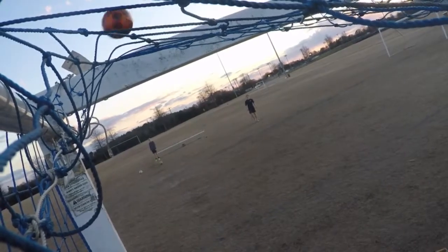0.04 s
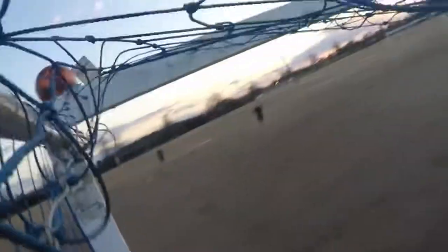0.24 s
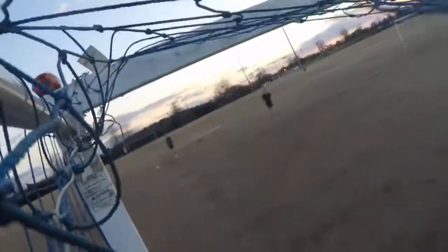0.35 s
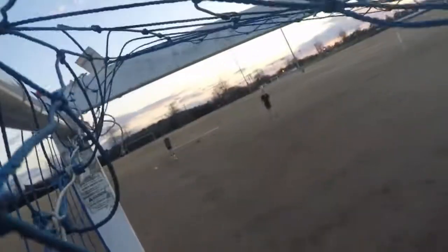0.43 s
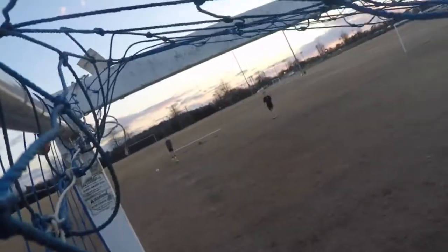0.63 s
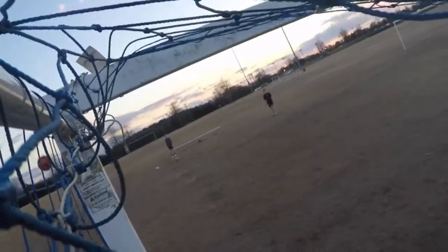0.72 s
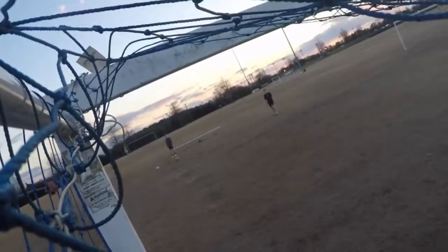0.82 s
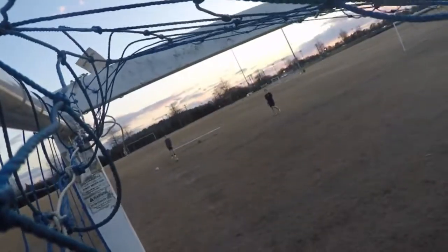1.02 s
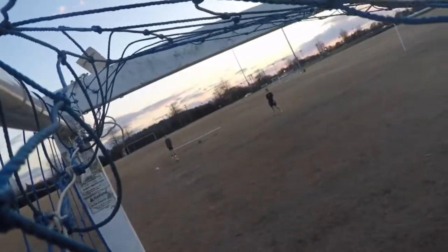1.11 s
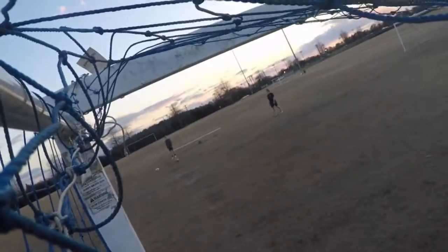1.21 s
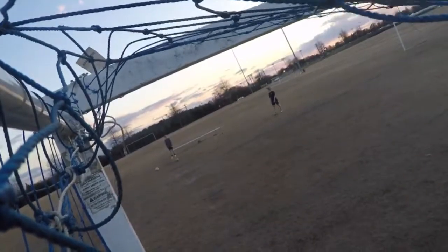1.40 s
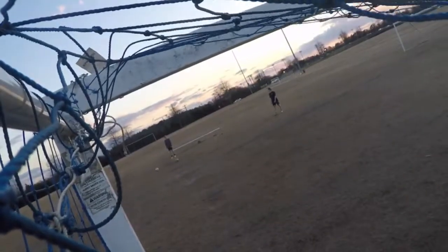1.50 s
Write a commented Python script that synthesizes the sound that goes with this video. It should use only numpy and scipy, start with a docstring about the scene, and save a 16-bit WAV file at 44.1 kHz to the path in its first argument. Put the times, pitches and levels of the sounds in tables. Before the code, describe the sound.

On an open field, a ball slams into a metal goal, overloading a microphone fixed to the frame. Quick clattering knocks and a brief ring die away, followed by one softer knock and low, faint wind.

```python
"""Ball on a goal frame

A ball strikes a metal goal frame on an open field. The blow swings the frame and overloads the
microphone of a camera clamped to it. The clamp knocks and chatters, the tube rings briefly and
a later knock follows. Wind rumble, a faint field hush and two faint whines lie under it all."""
import sys
import numpy as np
from scipy import signal
from scipy.io import wavfile
from scipy.ndimage import uniform_filter1d

SR = 44100
rng = np.random.default_rng(int(sys.argv[2]) if len(sys.argv) > 2 else 0)


def to_wav(sig):
    """Store sig (one row per channel, or 1-D mono) as 16-bit WAV at the path in sys.argv[1].

    Samples outside -1..1 are clipped; the rate is SR.
    """
    pcm = np.clip(np.atleast_2d(sig), -1, 1) * 32767
    pcm = np.round(pcm).astype(np.int16)
    wavfile.write(sys.argv[1], SR, pcm.T)  # frames by channels


N = 68355


def amp(db):
    return 10 ** (np.asarray(db) / 20)


def unit_rms(x):
    return x / np.sqrt(np.mean(x ** 2) + 1e-20)


def envelope(points, col=1):
    """Gain over time from a dB column, silent outside the table."""
    points = np.array(points)
    return amp(np.interp(np.arange(N) / SR, points[:, 0], points[:, col], left=-140, right=-140))


def add(mix, start_s, sound):
    part = mix[round(start_s * SR):][:len(sound)]
    part += sound[:len(part)]


def ring(modes, length_s, extra_db=0., tuning=0.95, polarity=1.):
    """Decaying sines, each at tuning * nominal_hz."""
    nominal_hz, level_db, t60_s = np.transpose(modes)[:, :, None]
    t = np.arange(round(length_s * SR)) / SR
    gains = amp(level_db + np.reshape(extra_db, (-1, 1)) - 60 * t / t60_s)
    pitch_hz = nominal_hz * np.reshape(tuning, (-1, 1))
    return (gains * np.reshape(polarity, (-1, 1)) * np.sin(2 * np.pi * pitch_hz * t)).sum(0)


def noise_band(spectrum, low_hz, high_hz, fft_size, flicker_db):
    """Shaped noise at unit RMS, flickering in patches of time and frequency."""
    hz = np.fft.rfftfreq(fft_size, 1 / SR)
    real, imag, patches = rng.standard_normal((N // (fft_size // 4) + 6, len(hz), 3)).T
    patches = uniform_filter1d(patches, size=9, axis=0)
    patches = unit_rms(uniform_filter1d(patches, size=5, axis=1))
    freq_hz, density_db = np.transpose(spectrum)
    shape = amp(np.interp(np.log(hz + 1), np.log(freq_hz + 1), density_db))
    shape *= (hz >= low_hz) * (hz < high_hz)
    spectra = (real + 1j * imag) * shape[:, None] * amp(flicker_db * patches)
    return unit_rms(signal.istft(spectra, nperseg=fft_size, noverlap=fft_size * 3 // 4)[1][:N])


# Wind spectrum: freq_hz, relative_db
WIND_SPECTRUM = [(8.8, -35.5), (15, -5.5), (37, -15.5), (45, -17), (86, -27), (130, -28), (176, -29.5),
                 (244, -28), (390, -38.5), (500, -48.5), (650, -76), (1100, -120)]
# Wind envelope: time_s, rumble_db, roar_db
WIND_LEVELS = [(0, -18, -63), (.2, -42.5, -37.5), (.4, -31, -58.5), (.5, -38, -59), (.58, -37, -85),
               (.66, -37.5, -64), (.9, -37, -62), (1.1, -35, -58.5), (1.3, -33, -55.5), (1.55, -36, -52.5)]


def wind(split_hz=74.54, gust_db=.7):
    """Wind makes a deep rumble and a roar just above it."""
    rumble = noise_band(WIND_SPECTRUM, 10, split_hz, fft_size=4096, flicker_db=gust_db)
    roar = noise_band(WIND_SPECTRUM, split_hz, 450, fft_size=1024, flicker_db=gust_db)
    return rumble * envelope(WIND_LEVELS) + roar * envelope(WIND_LEVELS, col=2)


# Midrange hush spectrum: freq_hz, relative_db
HUSH_SPECTRUM = [(190, -30), (330, -7.5), (394, -16), (707, -9.5), (937, -21), (1080, -12), (1610, -19),
                 (1870, -13), (2140, -16.5), (4000, -30), (5200, -62), (8800, -120)]
# Treble hiss spectrum: freq_hz, relative_db
HISS_SPECTRUM = [(2350, -30), (4000, 1), (5570, -4), (10000, -8.5), (10900, -10), (13700, -8.5),
                 (15300, -19)]
# Field envelope: time_s, hush_db, hiss_db
FIELD_LEVELS = [(0, -55, -72), (.2, -58.5, -71.5), (.45, -59.5, -72), (.56, -60.5, -69.5),
                (.67, -55.5, -67), (.71, -65.5, -80.5), (.98, -69, -84), (1.2, -65.5, -80),
                (1.4, -62.5, -77), (1.55, -63.5, -76)]


def field_hush(split_hz=4000):
    """The open field gives a faint hush topped by hiss."""
    hush = noise_band(HUSH_SPECTRUM, 330, split_hz, fft_size=512, flicker_db=2.04)
    hiss = noise_band(HISS_SPECTRUM, split_hz, 19000, fft_size=512, flicker_db=1.2)
    return hush * envelope(FIELD_LEVELS) + hiss * envelope(FIELD_LEVELS, col=2)


# Whine bands: centre_hz, width_hz, level_db
WHINE_BANDS = [(9300, 250, -94.5), (14300, 900, -89)]
# Envelope on both bands: time_s, gain_db
WHINE_GAIN = [(0, 8), (.21, 8), (.25, -3.5), (.66, 4.5), (.72, -7), (1.1, -20), (1.55, -4)]


def whines():
    """Two narrow noise bands whine faintly in the high treble."""
    out, flat = np.zeros(N), [(1, 0), (2, 0)]
    for centre_hz, width_hz, level_db in WHINE_BANDS:
        low_hz, high_hz = centre_hz - width_hz / 2, centre_hz + width_hz / 2
        out += amp(level_db) * noise_band(flat, low_hz, high_hz, fft_size=1024, flicker_db=2.5)
    return out * envelope(WHINE_GAIN)


# Clamp modes: nominal_hz, level_db, t60_s
CLAMP_MODES = [(531, -20, 0.04), (740, -9, 0.018), (938, -1.5, 0.012), (1388, 1.5, 0.011),
               (1662, 7, 0.0067), (1928, -17.5, 0.061), (2550, -11.5, .007), (3640, -16, 0.0073),
               (4130, -24.5, .005), (4950, -17.5, 0.011), (5600, -23, 0.0092), (6500, -20.5, 0.0067)]
# Low thump modes: nominal_hz, level_db, t60_s
THUMP_MODES = [(94.6, 1.5, 0.075), (140, -3, 0.055), (259.8, -16, .03)]
# Clamp knocks: start_s, gain_db, body_db, treble_db, lowpass_hz, thump_db
CLAMP_KNOCKS = [(0.2187, -38, 5, 0, 6000, -60.5), (.2218, -11.5, 1, 0, 7000, -59),
                (0.2237, -30, 0, 6, 9000, -61), (0.2261, -3.5, 6.5, 13.5, 12000, -61),
                (.2274, -6, -1, 13.5, 14000, -60), (0.2309, -15, 0, 5.5, 9000, -61),
                (0.244, -26, 3, 3, 8000, -59.5), (0.2432, -16, 2.5, -5, 6000, -62),
                (0.2807, -4.5, 0, -2, 6500, -13.5), (0.31, -32, 13, 15, 7000, -17),
                (0.319, -4, 4.5, 5.5, 9000, -10.5), (0.3478, -15.5, -1, -3.5, 5500, -26),
                (.369, -49, -3, 3, 4000, -31), (0.3715, -18.5, -3, -3.5, 5000, -22.5),
                (0.439, -64, 0, 7, 6000, -54), (0.578, -51, 3.5, 1, 4000, -61),
                (0.584, -41.5, -6, 18.5, 12000, -59), (0.5993, -12.5, 3, -0.5, 6000, -22),
                (.638, -53.5, -1, 6.5, 4000, -70), (0.664, -52.5, -7, 8, 5100, -70),
                (.672, -56, -2, 4.5, 4000, -74), (.786, -47, -3.5, 0, 4000, -72.5),
                (0.863, -47.5, 5.5, -0.5, 4000, -70), (.916, -59.5, 4, 2.5, 4000, -70),
                (0.982, -53.5, -0.5, 3.5, 4000, -65.5), (1.466, -52.5, 1.5, 3, 4000, -63)]
BODY_BELOW_HZ, TREBLE_ABOVE_HZ = 1150, 3000


def clamp_knocks(spread_db=1.2, detune=.012, crack_db=-30.5, crack_s=.0014):
    """Each knock cracks, rings the clamp a little differently, and thumps."""
    rise_s, thump_lag_s, length_s = .00039, .0022, .15
    out, mode_hz = np.zeros(N), np.array(CLAMP_MODES)[:, 0]
    t = np.arange(round(length_s * SR)) / SR
    cracks = rng.standard_normal((len(CLAMP_KNOCKS), len(t))) * np.exp(-t / crack_s)
    jitters = rng.standard_normal((len(CLAMP_KNOCKS), 2, len(CLAMP_MODES)))
    thump = (1 - np.exp(-t / thump_lag_s)) * ring(THUMP_MODES, length_s)
    for knock, (level_jitter, pitch_jitter), crack in zip(CLAMP_KNOCKS, jitters, cracks):
        start_s, gain_db, body_db, treble_db, lowpass_hz, thump_db = knock
        tone_db = body_db * (mode_hz < BODY_BELOW_HZ) + treble_db * (mode_hz > TREBLE_ABOVE_HZ)
        tap = ring(CLAMP_MODES, length_s, tone_db + spread_db * level_jitter, 1 + detune * pitch_jitter)
        tap += amp(crack_db + treble_db) * np.diff(crack, prepend=0)
        tap *= 1 - np.exp(-t / rise_s)
        tap = signal.lfilter(*signal.butter(3, lowpass_hz, fs=SR), tap)
        add(out, start_s, amp(gain_db) * tap)
        add(out, start_s + thump_lag_s, amp(thump_db) * thump)
    return out


# Chatter envelope: time_s, level_db
CHATTER_LEVELS = [(.22, -24), (.224, -4), (.24, -18.5), (.255, -23.5), (.275, -29), (.3, -42.5),
                  (.33, -39.5), (.36, -37.5), (.385, -48), (.42, -40), (.46, -61.5), (.56, -88),
                  (.59, -57.5), (.67, -75), (.72, -81)]


def clamp_chatter(clicks_per_s=1400, spread_db=4, treble_db=-8, lowpass_hz=7000):
    """Dense tiny clicks ring the clamp while the frame shakes."""
    strengths = amp(spread_db * np.minimum(rng.exponential(1, N), 4))
    clicks = strengths * (rng.random(N) < clicks_per_s / SR) * rng.choice([-1, 1], N)
    drive = unit_rms(clicks) * envelope(CHATTER_LEVELS)
    is_treble = np.array(CLAMP_MODES)[:, 0] > TREBLE_ABOVE_HZ
    clamp = ring(CLAMP_MODES, length_s=.1, extra_db=treble_db * is_treble)
    clamp = signal.lfilter(*signal.butter(1, lowpass_hz, fs=SR), clamp)
    return signal.fftconvolve(drive, clamp)[:N] / np.linalg.norm(clamp)


# Frame swing modes: nominal_hz, level_db, t60_s
SWING_MODES = [(45.9, 7.4, .129), (115, 12, .024), (172.8, 7.7, .052), (232.4, -3.4, .068)]


def ball_strike(start_s=.2227, push_s=.002):
    """The ball shoves the frame, which swings in low modes, neighbours in opposite sense."""
    out = np.zeros(N)
    shove = np.hanning(round(push_s * SR) + 3)
    swing = ring(SWING_MODES, length_s=.86, polarity=(-1.) ** np.arange(len(SWING_MODES)))
    add(out, start_s, np.convolve(swing, shove / shove.sum()))
    return out


# Metal tube modes: nominal_hz, level_db, t60_s
TUBE_MODES = [(137, 5, .3), (220, -8, .2), (733, -3, .14), (865, -14, .1), (1055, -13, .09),
              (1403, -11, .09), (1557, -5, .11), (1676, -2, .11), (1886, -8, .08), (2008, -10, .1),
              (2382, -5, .08), (2840, -13, .06)]
# Contacts on the tube: start_s, gain_db, decay_s
TUBE_CONTACTS = [(.242, -23.5, .015), (.28, -34.5, 0.012), (.325, -29, 0.011), (0.367, -24.5, 0.012)]


def tube_ring(lowpass_hz=3500):
    """Short scraping contacts set the tube's modes ringing."""
    drive, t = np.zeros(N), np.arange(2000) / SR
    for start_s, gain_db, decay_s in TUBE_CONTACTS:
        scrape = rng.standard_normal(len(t)) * np.exp(-t / decay_s)
        add(drive, start_s, amp(gain_db) * scrape / np.linalg.norm(scrape))
    ringing = signal.fftconvolve(drive, ring(TUBE_MODES, length_s=.52))[:N]
    return signal.lfilter(*signal.butter(2, lowpass_hz, fs=SR), ringing)


# Loose shaking modes: nominal_hz, relative_db, t60_s
SHUDDER_MODES = [(45, 1.5, .08), (80.2, -1.5, .08), (141.15, 0.5, 0.08), (232, -9.5, 0.085),
                 (278, -14.5, .06)]
# Shudder envelope: time_s, level_db
SHUDDER_LEVELS = [(.25, -52), (.275, -25), (.32, -25), (.37, -22), (.42, -39), (.47, -41), (.54, -48.5),
                  (.58, -54.5)]


def shudder():
    """Loose, random shaking in low modes follows the blow."""
    shaking = signal.fftconvolve(rng.standard_normal(N), ring(SHUDDER_MODES, length_s=.6))[:N]
    return unit_rms(shaking) * envelope(SHUDDER_LEVELS)


def scene():
    goal = ball_strike() + clamp_knocks() + tube_ring() + clamp_chatter() + shudder()
    return (goal + wind() + field_hush() + whines())[None]


def record(dry):
    """The microphone overloads with a firm knee; a low-pass then limits the band."""
    ceiling, knee, lowpass_hz = .98, 6, 15400
    overloaded = dry / (1 + abs(dry / ceiling) ** knee) ** (1 / knee)
    padded = np.pad(overloaded, ((0, 0), (255, 255)), "reflect")
    lowpass = signal.firwin(511, lowpass_hz, window=("kaiser", 9), fs=SR)
    return signal.oaconvolve(padded, lowpass[None], "valid")


dry = scene()
out = record(dry)
to_wav(out)
```